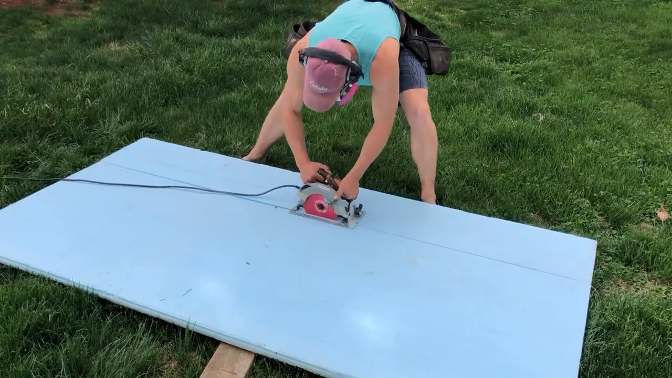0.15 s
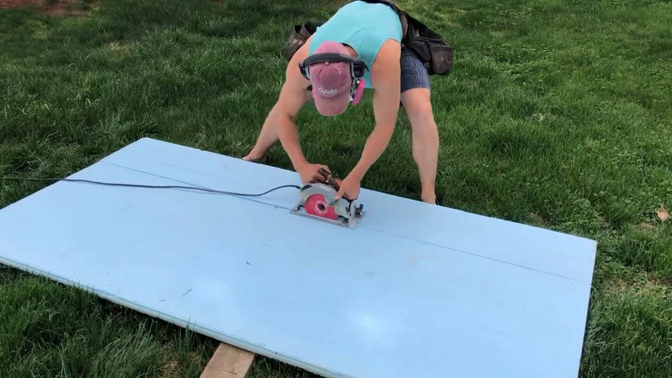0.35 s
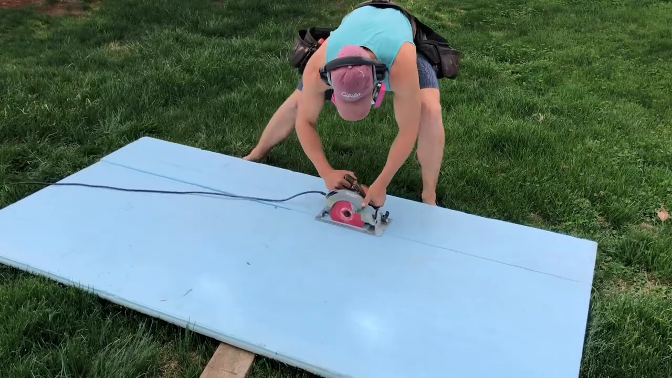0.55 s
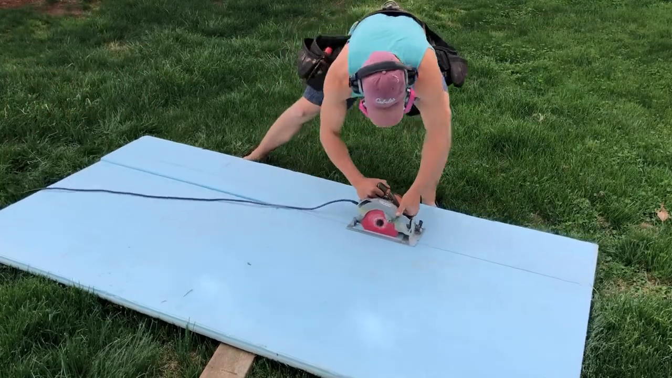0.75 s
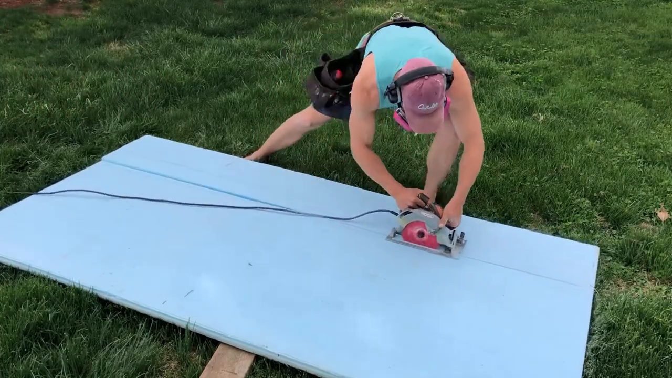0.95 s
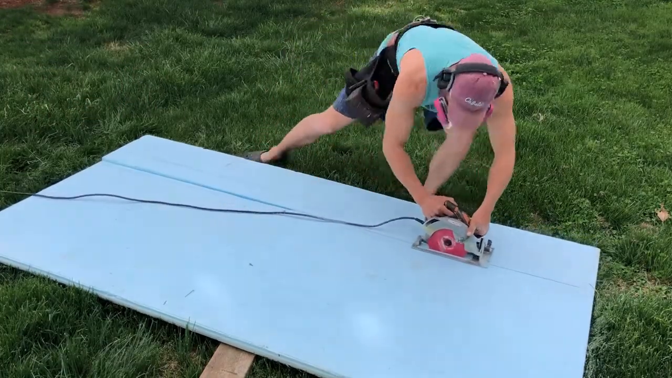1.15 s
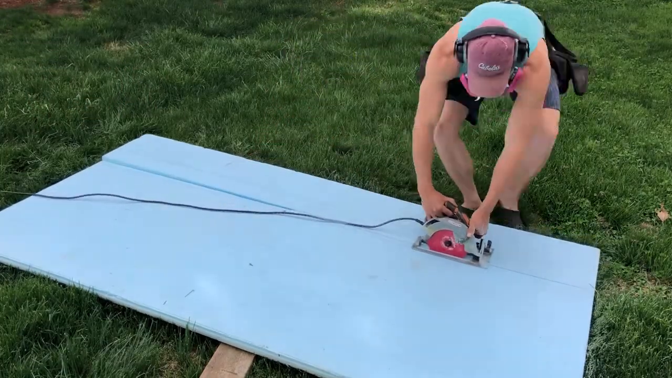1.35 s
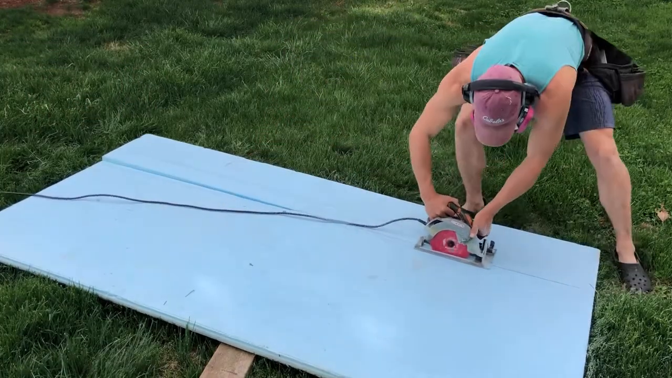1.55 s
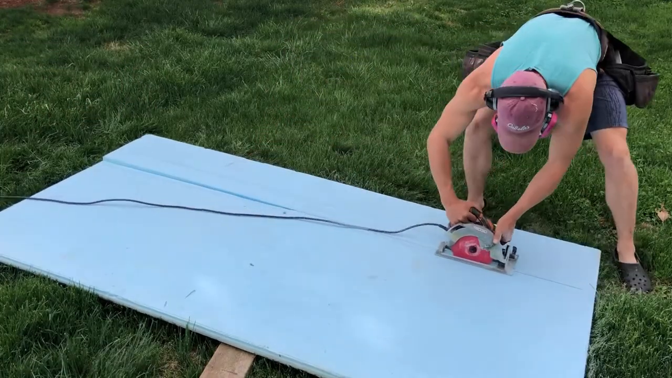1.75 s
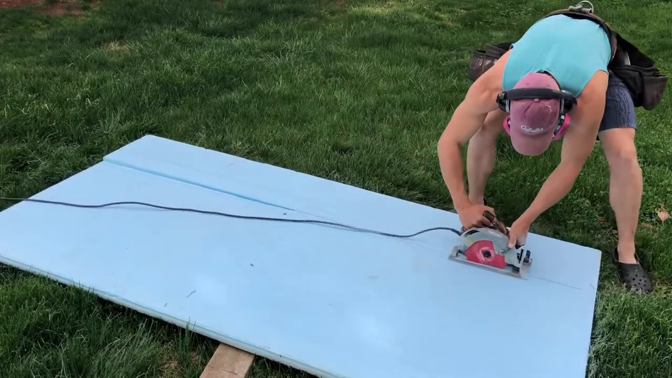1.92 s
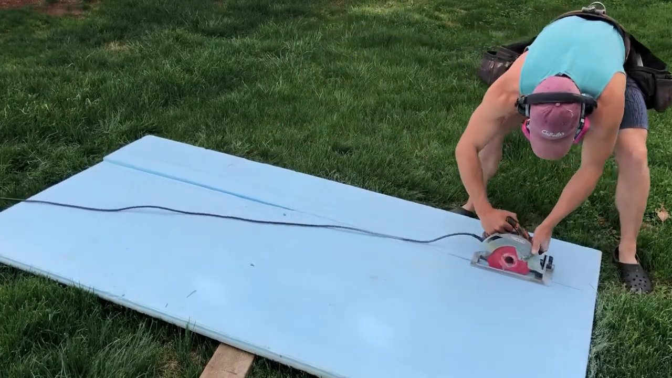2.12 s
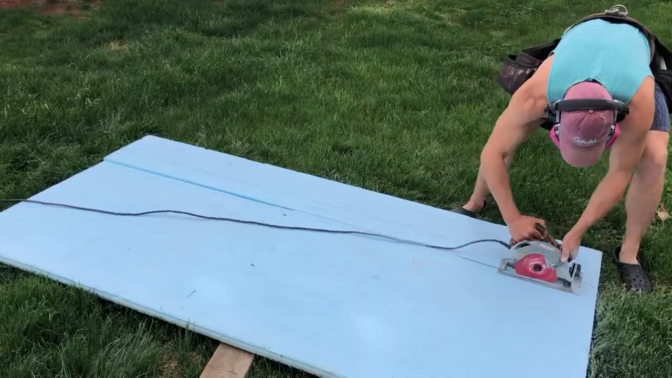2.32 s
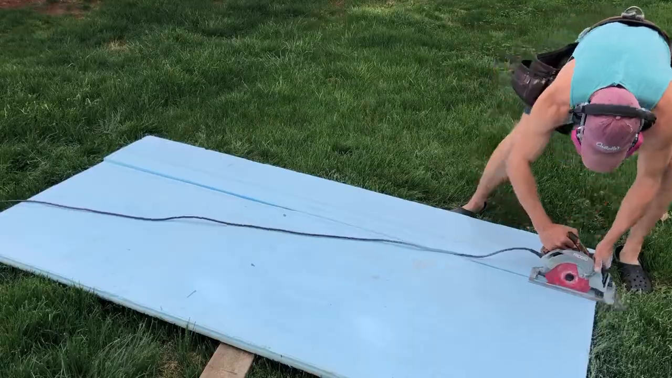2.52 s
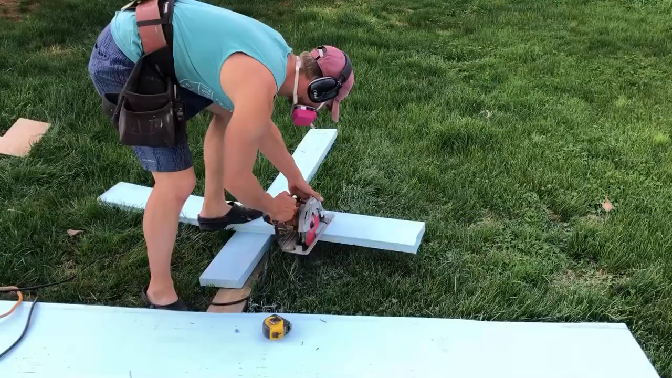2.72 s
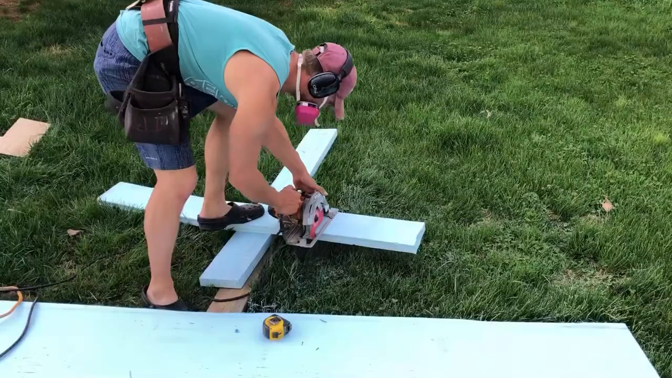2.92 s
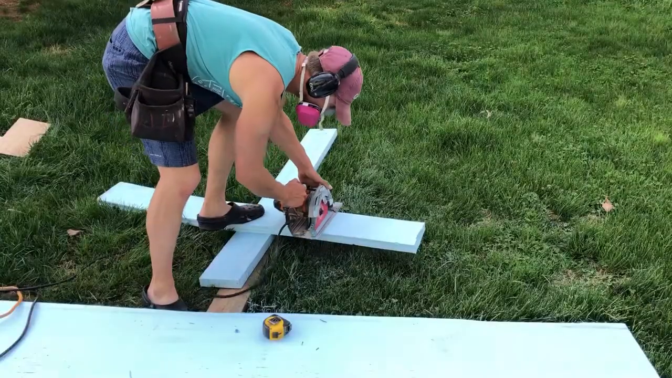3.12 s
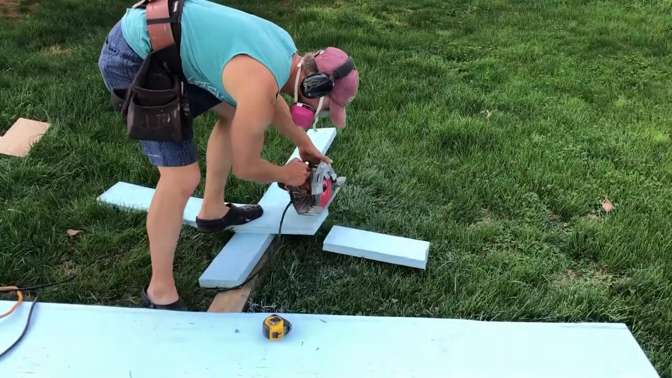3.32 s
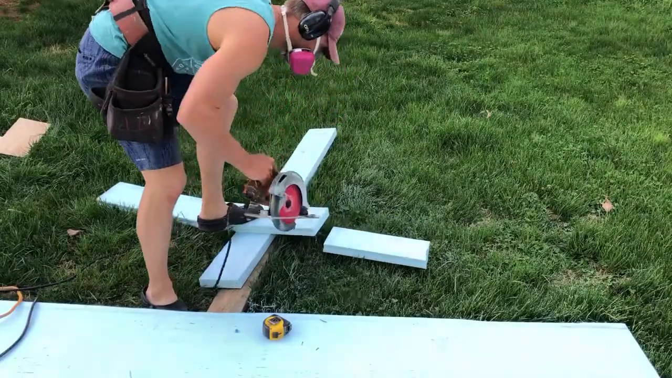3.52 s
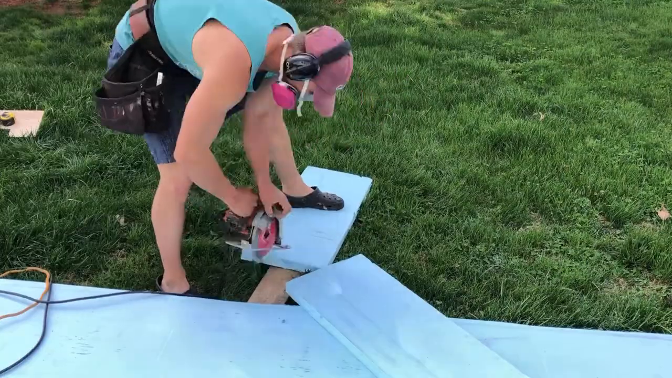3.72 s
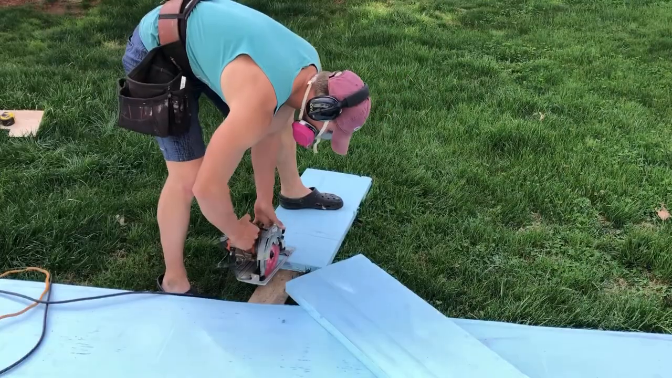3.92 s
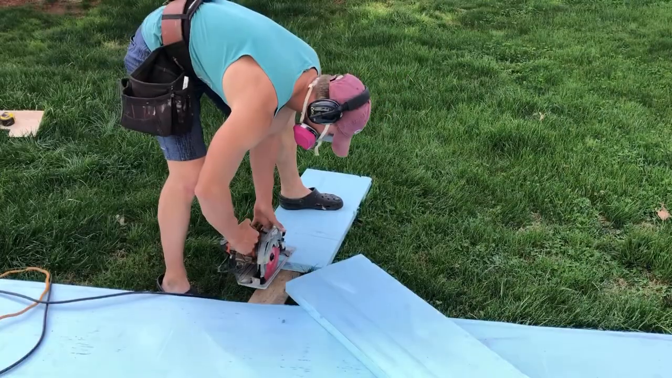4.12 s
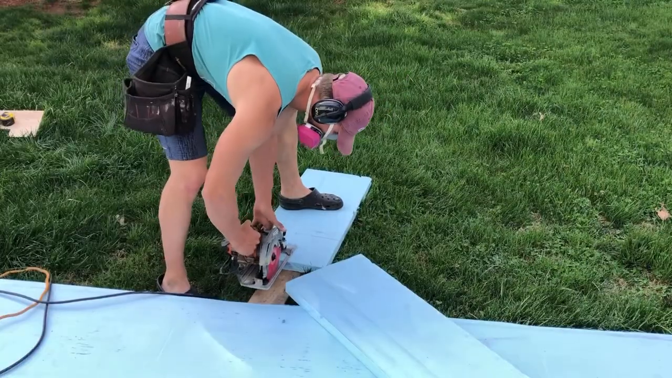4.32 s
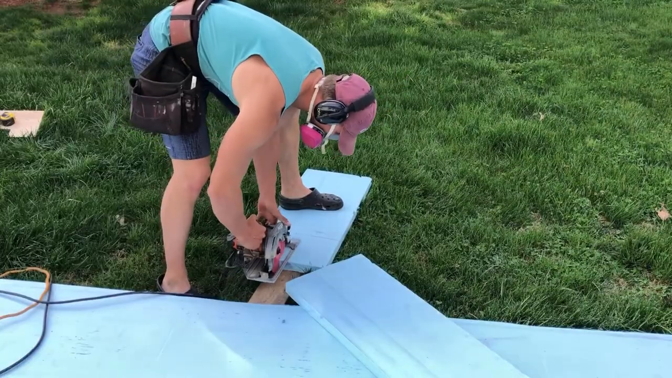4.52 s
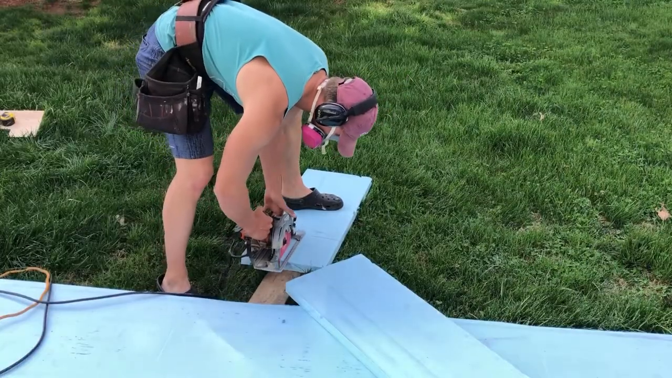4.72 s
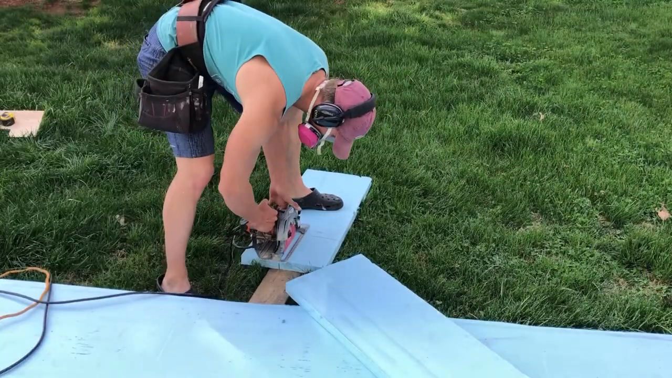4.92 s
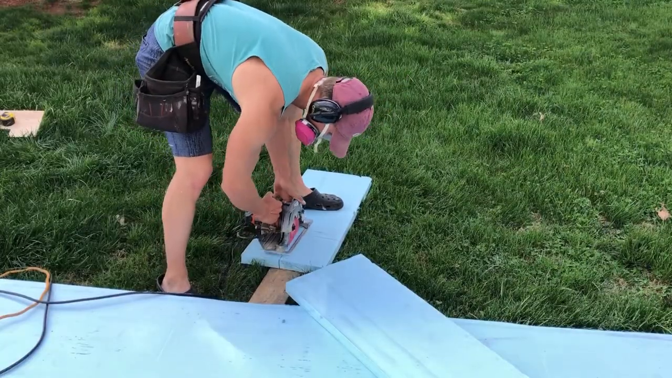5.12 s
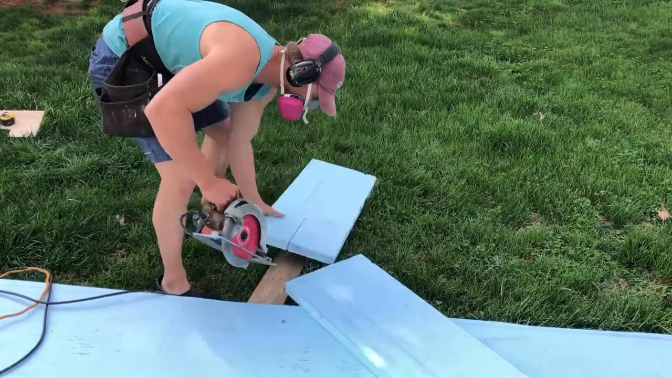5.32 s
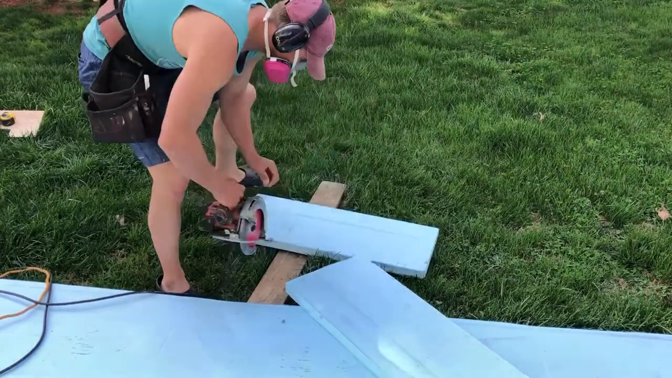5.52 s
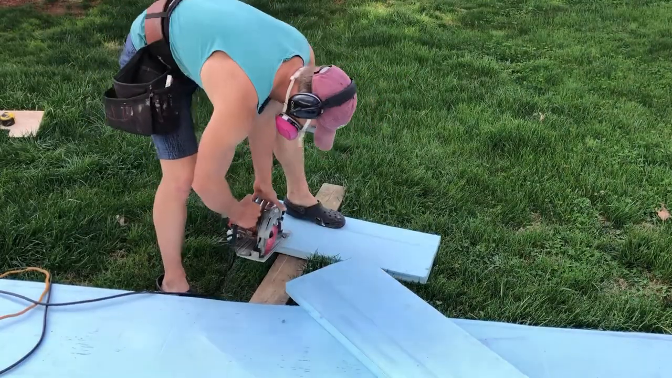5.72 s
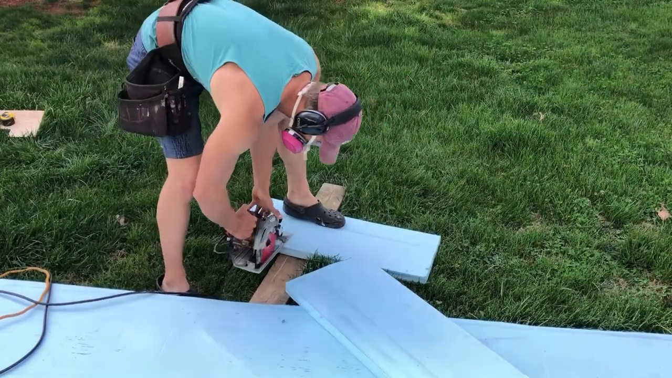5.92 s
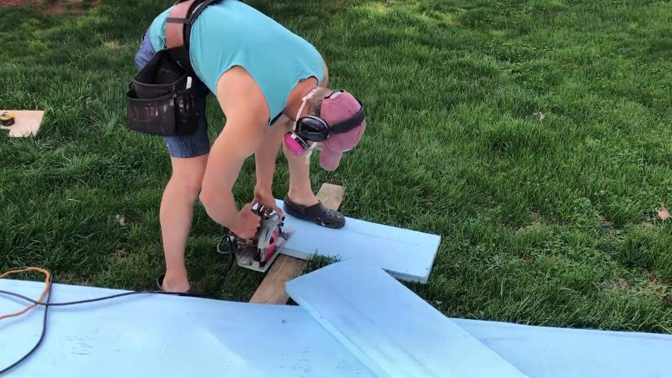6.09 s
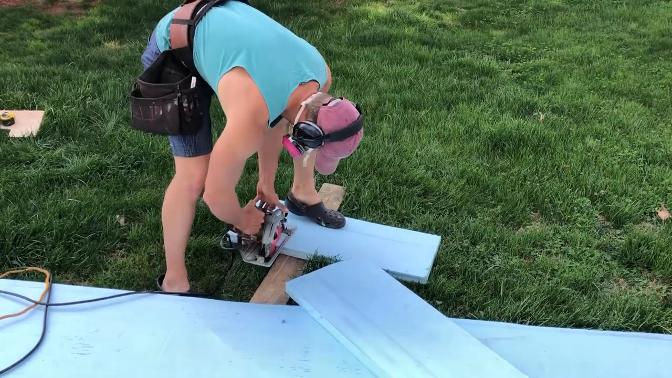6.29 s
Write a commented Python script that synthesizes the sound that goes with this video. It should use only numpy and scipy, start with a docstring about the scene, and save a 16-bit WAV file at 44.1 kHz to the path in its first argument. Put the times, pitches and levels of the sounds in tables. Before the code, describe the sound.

Open-air, dry, equal in both channels: a speeded-up electric saw bites into foam board, its piercing tooth whine riding on dense hiss. Two quick restarts buzz and surge, the cutting roughens, then cuts to silence for an instant. A brighter, airy cut follows at lower pitch and winds down. After a windy pause the saw snaps on again, hisses upward, coasts with rattling, and restarts until the abrupt end. Wind flutters low throughout.

```python
"""A tooth whine over the hiss of a cut: a corded circular saw cuts foam board on a lawn, in fast motion,
so every pitch lies several times higher. Six runs follow abruptly; some begin with a switch-on buzz and a
run-up, and gear lines fall as the blade coasts. Noise shaped by resonances makes the cut; sines locked to
the rotation make whine, gear and motor; decaying mains harmonics make the buzz. Short noise bursts make the
clicks, low lumpy noise the wind that buffets the microphone throughout; a faint far hiss joins later."""
import sys
import numpy as np
from scipy import signal
from scipy.fft import rfft, irfft
from scipy.io import wavfile
from scipy.ndimage import uniform_filter1d

SR = 44100
rng = np.random.default_rng(int(sys.argv[2]) if len(sys.argv) > 2 else 0)


def gain_from_db(level_db):
    """Turn a decibel level (scalar or array-like) into a linear amplitude factor."""
    decades = np.asarray(level_db, float) / 20
    return 10 ** decades


def generate_wav(signal):
    """Clip the signal to [-1, 1] and save it as 16-bit WAV at the path in sys.argv[1]."""
    frames = np.transpose(np.atleast_2d(signal))
    scaled = np.clip(frames, -1, 1) * 32767
    pcm = np.round(scaled).astype(np.int16)
    wavfile.write(sys.argv[1], SR, pcm)


N = 280035

# the runs of the saw: start_s, end_s, share of full speed missing at the start, run_up_time_constant_s
RUNS = [(0, .311, 0.0091, .04), (.312, 1.379, 0.42, 0.036), (1.381, 2.647, 0.54, 0.047),
        (2.681, 3.683, 0.0092, 0.0382), (4.011, 5.862, .6, .072), (5.864, 6.35, 0.63, 0.07)]
# under power, one list a run, its last row where the trigger is let go:
# time_s, tooth_passing_hz once up to speed, whine_db before the speed law, fan_air_db, bite_db into the foam
CUT = [
    [(0, 11300, -44, -33.5, -6.5), (.172, 11070, -42, -34, -6.5)],
    [(.34, 10440, -51, -34, -2.5), (.37, 10440, -38.5, -33.5, -1.5), (.7, 10420, -41.5, -34, 5),
     (.8, 10390, -40, -34, 3), (.85, 10590, -36.5, -35, 2), (1.0, 10440, -39, -35, 1.5),
     (1.08, 10540, -40, -33.5, -1.5)],
    [(1.385, 10100, -45, -39, 4), (1.44, 10200, -46, -33.5, 5.5), (1.5, 10170, -37.5, -36, 4.5),
     (1.646, 10110, -41.5, -35, 3.5), (1.752, 9760, -44, -36, 3.5), (1.88, 9650, -45, -37.5, 4),
     (1.934, 9940, -41, -34.5, 4), (2.162, 10010, -44.5, -35, 3), (2.482, 10280, -38.5, -35.5, -2),
     (2.55, 10620, -49.5, -39, -4)],
    [(2.68, 6274, -41, -29, 1), (2.956, 6220, -44, -28.5, 2.5), (3.158, 6030, -41.5, -28, 2.5),
     (3.26, 6060, -47, -29, -3)],
    [(4.02, 11340, -55, -34.5, -22), (4.06, 11720, -56, -37.5, -1.5), (4.15, 11670, -46, -36, -4),
     (4.316, 11510, -42, -35.5, -4.5), (4.456, 11310, -39, -35.5, -5), (4.646, 10700, -43, -35.5, -8.5),
     (4.868, 10600, -37.5, -37.5, -3.5), (4.98, 10170, -43.5, -35.5, -0.5),
     (5.095, 10300, -47, -34.5, -3.5)],
    [(5.9, 11500, -39, -35, -11), (5.95, 11650, -50, -36, 0.5), (6.05, 11640, -40.5, -32, -8),
     (6.35, 11000, -44.5, -34, 3)],
]


def saw():
    """Rotating source: noise follows speed and bite, and every line is a multiple of one rotation."""
    # while coasting, one row a run: rattle_db of each armature multiple over fan air,
    # chip_change_db, whine_change_db
    coast = [(-37, -0.5, -3), (-29.5, -2.5, 0), (-23, -7.5, 2), (-36.5, 1.5, -26), (-31, -5.5, -22),
             (-31, 0, 0)]
    # one row a run: board_db and chip_db over fan air, armature unbalance_db over chip hiss,
    # fan amplitude as a power of coasting speed
    balances = [(-2.5, 1, -13, 1.1), (-4.5, 0, -11, 0.87), (-5.5, 1.5, -15.5, 0.38), (-14, -8, -15, 1.36),
                (-10, 0.5, -14, 1.31), (-10, -3, -9.5, 1.2)]
    # the saw is lifted and swings open to the microphone: time_s, half_length_s, gain_db
    lifts = [(3.54, 0.056, 2), (5.336, 0.11, 3.5)]
    teeth, pinion_teeth, gear_teeth = 24, 9, 42
    layers = noise_layers()
    flutters = np.array([drift(15.0) for _ in range(6)])
    rub_gains = rub_strengths()
    scuffs = np.array([drift(58.0) for _ in range(3)])
    rings, jolt_ring = free_rings(), whistle(4600, 710)
    jitter = 1 + 0.001 * drift(65)
    out = np.zeros(N)
    for run, material in enumerate([0, 0, 0, 1, 2, 3]):
        start_s, end_s, _, _ = RUNS[run]
        span = slice(round(start_s * SR), round(end_s * SR))
        t, flutter = (np.arange(N) / SR)[span], flutters[:, span]
        full_hz, whine_db, air_db, bite_db = (column[span] for column in in_time(CUT[run]))

        rising, falling = speed_share(run, t)
        blade_hz = full_hz * rising * falling / teeth * jitter[span]
        motor_hz = blade_hz * gear_teeth / pinion_teeth
        blade, motor = np.cumsum(blade_hz) / SR, np.cumsum(motor_hz) / SR   # turns
        rattle_db, chip_change_db, whine_change_db = coast[run]
        chips_die_s = 0.055
        coasting = 1 - np.exp(-np.maximum(t - CUT[run][-1][0], 0) / chips_die_s)

        # levels follow the bite and powers of the speed
        board_over_db, chip_over_db, unbalance_db, fan_power = balances[run]
        lift_db = sum(db * np.exp(-((t - s) / half_s) ** 2) for s, half_s, db in lifts)
        falling_db = 20 * np.log10(falling)
        fan_db = air_db + fan_power * falling_db + lift_db
        chip_db = fan_db + chip_over_db + 0.2 * bite_db + chip_change_db * coasting
        board_db = chip_db - chip_over_db + board_over_db + bite_db - 0.3 * falling_db
        whine_db = whine_db + 1.5 * 20 * np.log10(rising * falling) + whine_change_db * coasting

        sound = np.zeros(len(t))
        for db, wobble, layer in zip((board_db, chip_db, fan_db), flutter, layers[material][:, span]):
            sound += gain_from_db(db + 0.64 * wobble) * layer
        sound += gain_from_db(whine_db) * line(teeth * blade, teeth * blade_hz, 2.4 * flutter[3])
        unbalance = rising * falling ** 4 * line(motor, motor_hz, 2 * flutter[4])
        sound += gain_from_db(chip_db + unbalance_db) * unbalance
        free_ring = sum(gain_from_db(dbs.get(run, -np.inf)) * ring[span] for ring, dbs in rings)
        jolt = start_jolt(run, t - start_s) * jolt_ring[span]
        sound += gain_from_db(fan_db) * (coasting * free_ring + jolt)
        sound += motor_lines(run, motor, motor_hz, whine_db, flutter)

        # the gear also chatters while it runs up
        loose = coasting + np.maximum(0.9 - rising, 0) / 0.9
        free = loose > 0
        # the slower the blade, the more the chatter stands out
        rattle_gain = loose * gain_from_db(fan_db + rattle_db) / falling ** 0.23
        sound[free] += rattle_gain[free] * rattle(run, motor[free], motor_hz[free])
        sound += kerf_rub(blade, blade_hz, rub_gains[:, span], flutter, scuffs[:, span])
        out[span] = sound
    return out


def speed_share(run, t):
    """Relaxation of rotation: exponential run-up; after release, drag and dry friction slow the blade."""
    # one row a run: drag_time_constant_s, dry friction as a share of speed
    slowing = [(.6, 1.0), (.9, 2.0), (.75, .5), (.875, .05), (.59, .24), (1, .5)]
    start_s, _, missing, rise_s = RUNS[run]
    drag_s, friction = slowing[run]
    since_release = np.maximum(t - CUT[run][-1][0], 0)
    falling = (1 + friction) * np.exp(-since_release / drag_s) - friction
    return 1 - missing * np.exp(-(t - start_s) / rise_s), np.maximum(falling, 0.02)


def noise_layers():
    """Source and filter: one noise split into board drumming, chip hiss and fan air for each material."""
    # saw noise on the long board: frequency_hz, relative_level_db (per Hz)
    long_board = [(240, -11), (400, -11), (1410, 12.5), (2920, -4), (4460, -3.5), (8180, -15),
                  (10100, -13.5), (15000, -15)]
    # on the crossed strips: frequency_hz, relative_level_db
    strips = [(400, -58), (567, 0.5), (756, 4), (1250, 10.5), (3660, 3), (6040, -1), (11500, 10.5),
              (13500, 0.5), (14600, 9), (15800, 3)]
    # on the short offcuts: frequency_hz, relative_level_db
    offcuts = [(710, -21.5), (1450, -7), (1800, -13), (2200, -6.5), (3000, -5.5), (4400, -9), (7200, -5),
               (9000, -1), (11000, 2), (13500, 4), (15500, 3.5)]
    # on the last offcut: frequency_hz, relative_level_db
    last_offcut = [(710, -13), (1500, -7), (2300, -5.5), (3000, -7), (3800, -13.5), (5000, -6.5),
                   (7000, -4), (9500, -4.5), (11500, -1), (15500, 1.5)]
    source = board_modes(chips(grain_db=0.8, per_s=150), depth_db=2.0)
    edges_hz = [(1, 2600), (2600, 7000), (7000, 1e6)]
    return np.array([[coloured(source, colour, low, high) for low, high in edges_hz]
                     for colour in (long_board, strips, offcuts, last_offcut)])


def chips(grain_db, per_s):
    """Shot noise: torn foam beads snap at random moments in steady air noise."""
    heights = gain_from_db(grain_db * np.minimum(rng.exponential(1, N), 2))
    snaps = (rng.random(N) < per_s / SR) * heights
    return rng.standard_normal(N) * (1 + 1.66 * signal.lfilter([1], [1, -0.9], snaps))


def board_modes(x, depth_db):
    """Modal resonance: narrow random peaks of board and blade come and go as the kerf grows."""
    _, _, cells = signal.stft(x, nperseg=2048)
    shifting = uniform_filter1d(rng.standard_normal(cells.shape), size=3, axis=0)
    shifting = uniform_filter1d(shifting, size=8, axis=1)   # a life of 8 steps of 23 ms
    return signal.istft(cells * gain_from_db(depth_db * rms_one(shifting)), nperseg=2048)[1][:N]


def motor_lines(run, motor, motor_hz, whine_db, flutter):
    """Order tracking: bearing, cooling fan and second tooth harmonic keep fixed ratios to the armature."""
    # driven lines: turns of each for one turn of the armature
    orders = [3.07, 5, 72 / 7]
    # one row a run: bearing_db, fan_db, second_harmonic_db, all over the whine
    over_whine = [(-15, -31, 2), (-21, -26, -16), (-26, -2.5, -2), (-0.5, -2, 7), (-23, -9, -12),
                  (-3, -9, -4)]
    return sum(gain_from_db(whine_db + db) * line(order * motor, order * motor_hz, 2 * flutter[k])
               for k, (order, db) in enumerate(zip(orders, over_whine[run])))


def rattle(run, motor, motor_hz):
    """Harmonic series: unloaded gear and brushes chatter on armature multiples that flare on resonances."""
    # multiples that stand out, one list a run: armature_multiple, over_others_db
    standouts = [
        [],
        [(5, 3), (9, 14.5), (18, 15)],
        [],
        [(1, 10), (3, 15.5), (4, 9), (5, 11), (6, 9), (15, 15)],
        [(6, 9), (9, 9.5), (17, 7), (28, 10.5)],
        [],
    ]
    # resonances on which the lines flare: frequency_hz, width_hz, gain_db
    flares = [(2200, 160, 2), (4400, 420, 9), (7270, 1500, 13.5), (11900, 1100, 2)]
    turns = np.arange(1, 45)[:, None]
    db = np.zeros(turns.shape)
    for multiple, over_db in standouts[run]:
        db[round(multiple) - 1] = over_db
    # slow chatter and eight times faster rasp make each line uneven
    chatter_db, chatter_s, rasp_db = 6, 0.0251, 3.5
    steps = np.arange(len(motor)) / (chatter_s * SR)
    chatter = np.array([np.interp(steps, np.arange(len(row)), row)
                        for row in rng.standard_normal((len(turns), 64))])
    rasp = np.array([np.interp(8 * steps, np.arange(len(row)), row)
                     for row in rng.standard_normal((len(turns), 512))])
    db = db + chatter_db * chatter + rasp_db * rasp + resonance_db(turns * motor_hz, flares)
    return line(turns * motor, turns * motor_hz, db).sum(axis=0)


def rub_strengths():
    """Intermittent contact: one gain curve for each multiple on which the blade rubs the kerf."""
    # one list for each multiple of the blade rotation: start_s, end_s, level_db
    rubs = [
        [(0.07, 0.206, -57.5)],
        [(2.25, 2.497, -53.5), (2.9, 3.05, -55.5)],
        [(1.65, 1.96, -46.5)],
        [(.45, 1.1, -45.5), (1.9, 2.55, -43.5)],
        [(.5, .95, -43.5), (1.8, 1.92, -41)],
        [(0, .17, -49), (.45, 1.1, -43.5), (1.45, 1.8, -40), (2.3, 2.55, -48.5)],
        [(.45, .82, -42), (2.3, 2.5, -46)],
        [(.84, .96, -46), (1.9, 2.32, -41)],
        [(0.547, 1.056, -46)],
    ]
    return np.array([sum(gain_from_db(db) * gate(a, b, edge_s=0.012) for a, b, db in rows) for rows in rubs])


def kerf_rub(blade, blade_hz, gains, flutter, scuffs):
    """Periodic friction: the blade rubbing the kerf sounds multiples of its rotation, unevenly."""
    # multiples of the blade rotation
    rub_turns = [1, 2, 2.5, 3, 3.4, 4, 5, 6, 7]
    return sum(gain * line(turns * blade, turns * blade_hz, 2.67 * flutter[k % 6] + 1.74 * scuffs[k % 3])
               for k, (turns, gain) in enumerate(zip(rub_turns, gains)))


def free_rings():
    """Free vibration: blade and guard keep ringing in narrow bands while coasting."""
    # frequency_hz, width_hz, {run: level_db over fan air}
    ring_bands = [(1253, 200, {1: -5, 3: -18.5}), (2265, 180, {3: -14.5, 4: -18}),
                  (4300, 110, {1: -10, 4: -13.5})]
    return [(whistle(hz, width_hz), dbs) for hz, width_hz, dbs in ring_bands]


def start_jolt(run, since_start_s):
    """Impulse response: switch-on jolts the guard, whose ring decays exponentially."""
    # runs that start from low speed, {run: level_db over fan air}
    jolt_db = {1: 1, 2: 6, 4: -12, 5: -6}
    return gain_from_db(jolt_db.get(run, -np.inf)) * np.exp(-since_start_s / 0.063)


def line(turns, hz, flutter_db):
    """Synchronous tone: a sine locked to a rotation, louder on blade resonances, gone above the band."""
    gain = np.sqrt(2) * gain_from_db(ringing_db(hz) + flutter_db)
    return gain * (hz < 0.4 * SR) * np.sin(2 * np.pi * turns)


def ringing_db(hz):
    """Resonance: blade and guard boost or weaken a line or noise that passes their modes."""
    # frequency_hz, width_hz, gain_db
    blade_ring = [(2260, 76, -3.5), (4420, 630, 2.5), (8050, 4500, 0.5), (13700, 2600, 3)]
    return resonance_db(hz, blade_ring)


def resonance_db(hz, peaks):
    """Lorentzian resonance curves, added in dB."""
    return sum(db / (1 + (2 * (hz - centre) / width) ** 2) for centre, width, db in peaks)


def coloured(x, spectrum, low=1, high=1e6):
    """Linear filtering: the spectrum and blade resonances between two soft edges; rms 1."""
    hz, points = np.fft.rfftfreq(N, 1 / SR) + 1, np.array(spectrum)
    edges = 1 / np.sqrt((1 + (low / hz) ** 12) * (1 + (hz / high) ** 12))
    db = np.interp(np.log(hz), np.log(points[:, 0]), points[:, 1]) + ringing_db(hz)
    return rms_one(irfft(rfft(x) * edges * gain_from_db(db), N))


def whistle(hz, width_hz):
    """Quadrature modulation: noise in a narrow band around a centre that may move."""
    phase = 2 * np.pi * np.cumsum(hz * np.ones(N)) / SR
    return drift(width_hz / 2) * np.sin(phase) + drift(width_hz / 2) * np.cos(phase)


def drift(rate_hz):
    """Low-passed random motion of rms 1, past its settling second."""
    r = np.exp(-2 * np.pi * rate_hz / SR)
    return rms_one(signal.lfilter([1], [1, -2 * r, r * r], rng.standard_normal(N + SR))[SR:])


def rms_one(x):
    """Normalisation of mean power to one."""
    return x / np.sqrt(np.mean(x ** 2) + 1e-20)


def in_time(rows):
    """Linear interpolation of control points; the first column is time in seconds."""
    s, *columns = np.transpose(rows)
    return [np.interp(np.arange(N) / SR, s, c) for c in columns]


def gate(start, end, edge_s=0.001):
    """Rectangular envelope: one between the two times, with straight edges outside them."""
    t = np.arange(N) / SR
    return np.clip(np.minimum(t - start, end - t) / edge_s + 1, 0, 1)


def band(x, low, high):
    """Band-pass filtering between two frequencies in Hz."""
    return signal.sosfilt(signal.butter(2, [low, min(high, 0.45 * SR)], "band", fs=SR, output="sos"), x)


def breakout():
    """Moving resonance: hiss gathers in a climbing, swelling band as the blade nears the edge, then stops."""
    start_s, end_s, from_hz, to_hz, end_db, width_hz = 4.5, 5, 3900.5, 6199.5, -34.5, 2600
    along = np.clip((np.arange(N) / SR - start_s) / (end_s - start_s), 0, 1)
    swell = gain_from_db(end_db) * np.sqrt(along) * gate(start_s, end_s, edge_s=0.018)
    return swell * whistle(from_hz + (to_hz - from_hz) * along, width_hz)


def mains():
    """Magnetic force: inrush current shakes the field coils in a dying harmonic buzz; a plain hum can stay."""
    # switch-on under full current: time_s, buzz_db, decay_by_60_db_s
    switch_on = [(0.312, -27.5, 0.12), (1.382, -23.5, 0.33), (4.013, -31.5, 0.22), (5.864, -28.5, 0.19)]
    # steady mains hum under load: start_s, end_s, level_db
    hum = [(0.316, 0.851, -51)]
    t = np.arange(N) / SR
    buzz_hz = 598
    phase = 2 * np.pi * buzz_hz * t
    orders = np.arange(2, 23)
    order_db = rng.normal(0, 3, len(orders)) + 9 * (orders == orders[0])
    strengths = gain_from_db(order_db + ringing_db(orders * buzz_hz) - 0.4 * orders)
    buzz = sum(g * np.sin(k * phase + k * k) for k, g in zip(orders, strengths))
    # brush sparking in step with the current
    sparks = rng.standard_normal(N) * (1 + np.cos(phase)) ** 2
    rough = rms_one(rms_one(buzz) + 1.35 * rms_one(band(sparks, 2800, 14600)))
    dying = sum(gain_from_db(db - 60 * np.maximum(t - s, 0) / t60) * (t >= s) for s, db, t60 in switch_on)
    hum_gain = sum(gain_from_db(db) * gate(a, b) for a, b, db in hum)
    return rough * dying + hum_gain * np.sqrt(2) * np.sin(phase)


def clicks():
    """Impact excitation: trigger, guard and offcuts snap, each a band of noise decaying in milliseconds."""
    # time_s, peak_db, centre_hz
    snaps = [(1.292, -22, 1384), (2.452, -19, 5100), (2.634, -18, 7720), (3.918, -35, 12400),
             (4.012, -19, 9000), (5.22, -19.5, 7100), (5.559, -27, 3450), (3.817, -40, 1880)]
    out, fade = np.zeros(N), np.exp(-np.arange(400) / 120.0)
    for (s, db, hz), noise in zip(snaps, rng.standard_normal((len(snaps), 400))):
        snap = band(noise * fade, hz / 1.25, hz * 1.25)
        at = round(s * SR)
        out[at:at + 400] += gain_from_db(db) * snap / np.abs(snap).max()
    return out


def wind():
    """Turbulent pressure on the microphone port: lumpy low noise; stronger buffets reach higher."""
    # rising and falling wind rumble: time_s, level_db
    wind_level = [(0, -65), (.5, -56.5), (1.2, -54.5), (1.5, -42.5), (1.7, -54), (2.1, -48), (2.65, -60.5),
                  (3.1, -48), (3.3, -58), (3.683, -55), (3.684, -41.5), (3.77, -36), (3.79, -49),
                  (3.93, -44.5), (4.1, -52.5), (4.3, -62.5), (4.9, -45.5), (5.1, -53), (5.73, -43),
                  (5.76, -58), (5.81, -46.5), (5.83, -40.5), (6.35, -41)]
    # strongest buffets: time_s, peak_db
    buffets = [(1.293, -28), (1.31, -27), (1.57, -26), (3.694, -28), (3.708, -31), (3.722, -30.5),
               (3.739, -27.5), (3.757, -25.5), (3.816, -27), (4.775, -31), (4.841, -31), (4.918, -27.5),
               (4.995, -33), (5.256, -31.5), (5.325, -34.5), (5.496, -26), (5.519, -25), (5.542, -27),
               (5.563, -30), (5.614, -27), (5.646, -29.5), (5.7, -36.5), (5.733, -29), (5.824, -29),
               (5.836, -24), (5.855, -26.5), (5.897, -25.5), (5.953, -31), (6.073, -25), (6.234, -25),
               (6.298, -26), (6.332, -25)]
    lumps = gain_from_db(3.54 * np.minimum(drift(24.0), 1.5))
    rumble = rms_one(band(rng.standard_normal(N) * lumps, 248, 777))
    out, t = gain_from_db(in_time(wind_level)[0]) * rumble, np.arange(3000) / SR
    for (s, db), noise in zip(buffets, rng.standard_normal((len(buffets), 3000))):
        top_hz = np.clip(1395 + 60 * (db + 28.0), 500, 3000)
        puff = band(noise * t * np.exp(-t / 0.0039), 378, top_hz)
        puff = band(puff, 223, 2 * top_hz)
        at = round((s - 0.002) * SR)
        out[at:at + 3000] += (gain_from_db(db) * puff / np.abs(puff).max())[:N - at]
    return out


def far_hiss():
    """Stationary coloured noise: a faint far hiss during the last runs."""
    # frequency_hz, relative_level_db
    hiss_colour = [(710, -34), (1200, -46), (1680, -18), (3910, -5), (16000, -26)]
    return gain_from_db(-62.5) * coloured(rng.standard_normal(N), hiss_colour) * gate(3.684, N / SR)


def level_dips():
    """Amplitude modulation: the level dips briefly."""
    # time_s, gain_db
    dips = [(2.719, -12), (5.976, -8)]
    t = np.arange(N) / SR
    return gain_from_db(sum(db * np.exp(-((t - s) / 0.0031) ** 2) for s, db in dips))


def scene():
    """Superposition of all sources, equal in both channels, with one short silence."""
    # the silence: start_s, end_s
    silence = (2.647, 2.681)
    dipped = (saw() + breakout() + mains() + far_hiss()) * level_dips()
    mix = (dipped + clicks() + wind()) * (1 - gate(*silence))
    return np.tile(mix, (2, 1))


def top_cut(x):
    """Nothing passes above the cut-off."""
    return signal.sosfilt(signal.butter(12, 15780, fs=SR, output="sos"), x)


def record(dry):
    """High-pass response: one microphone with its bass rolled off."""
    thin = signal.sosfilt(signal.butter(2, 170, "high", fs=SR, output="sos"), dry)
    return top_cut(thin)


dry = scene()
out = record(dry)
generate_wav(out)
```